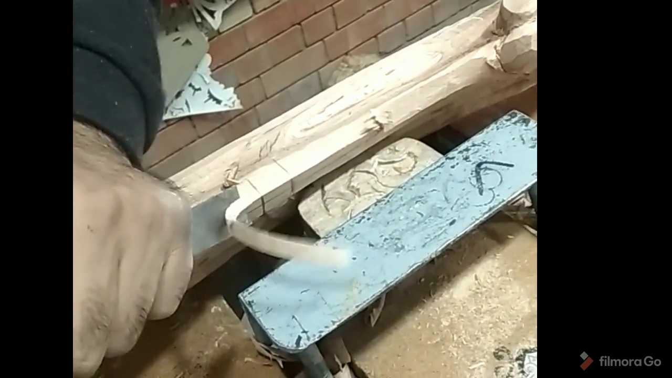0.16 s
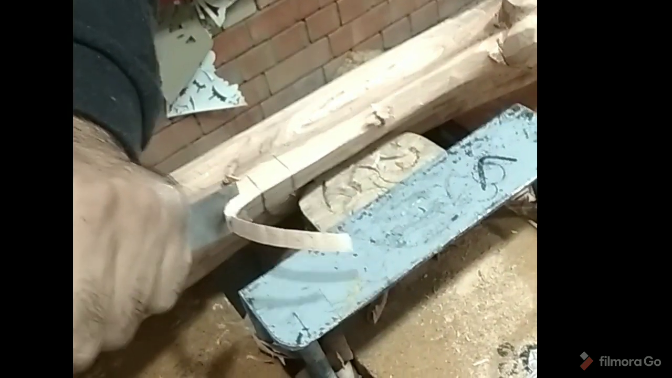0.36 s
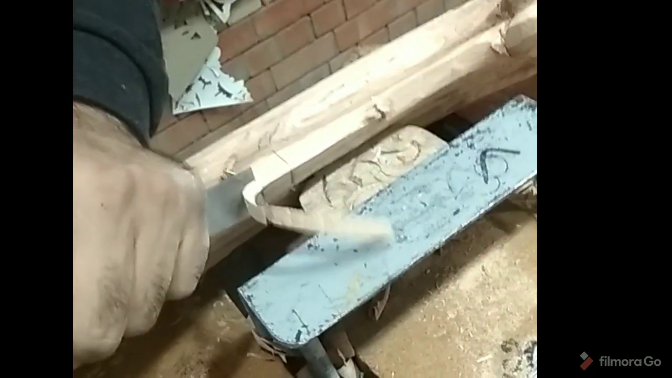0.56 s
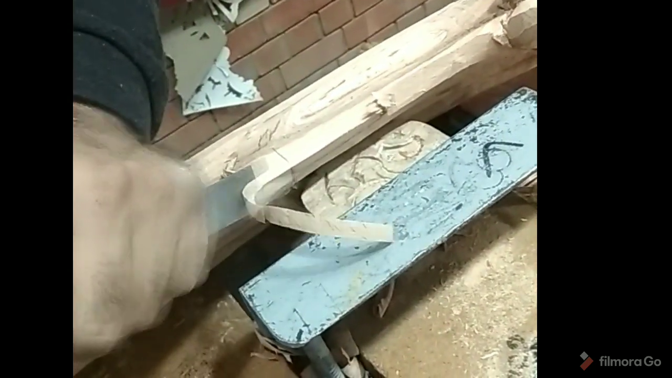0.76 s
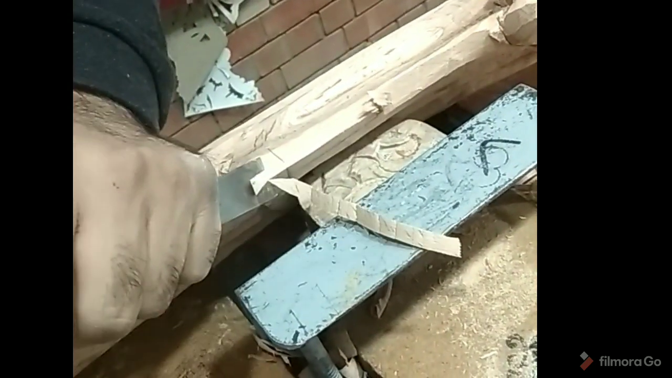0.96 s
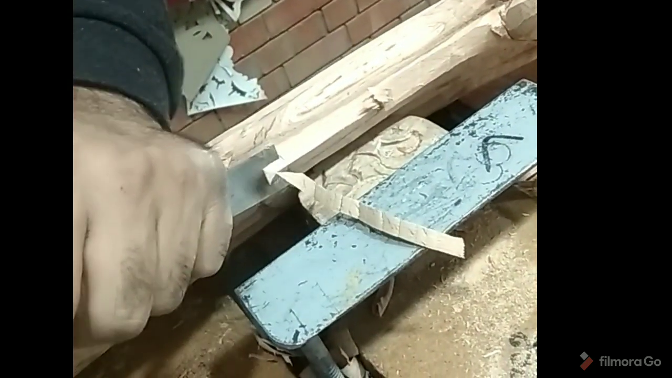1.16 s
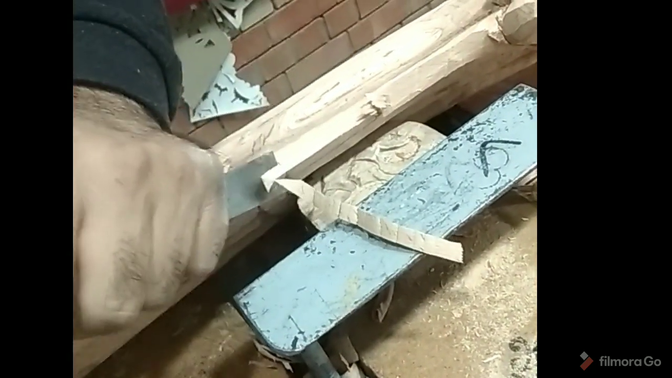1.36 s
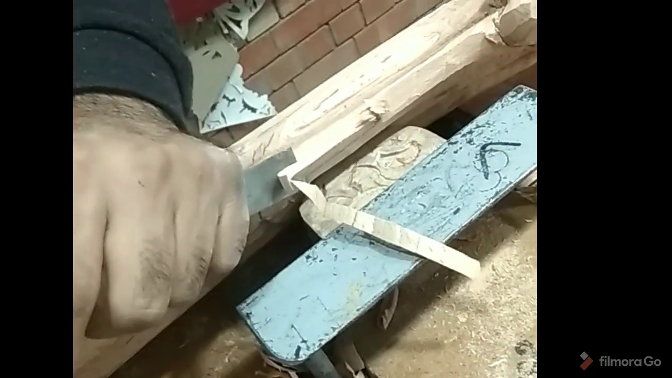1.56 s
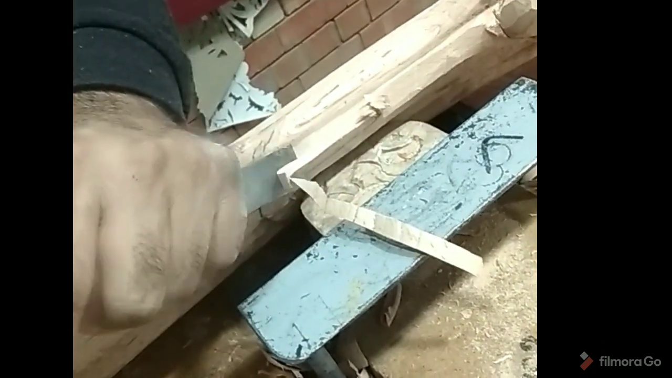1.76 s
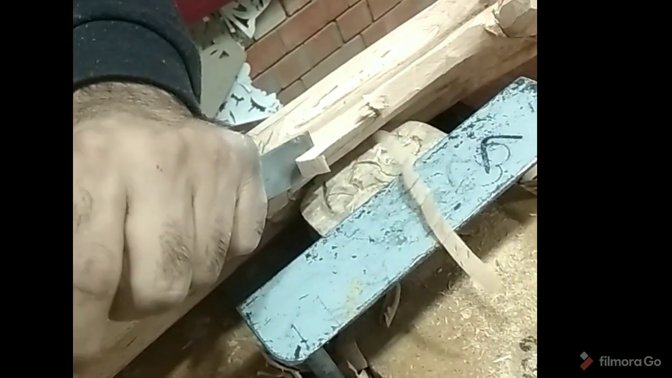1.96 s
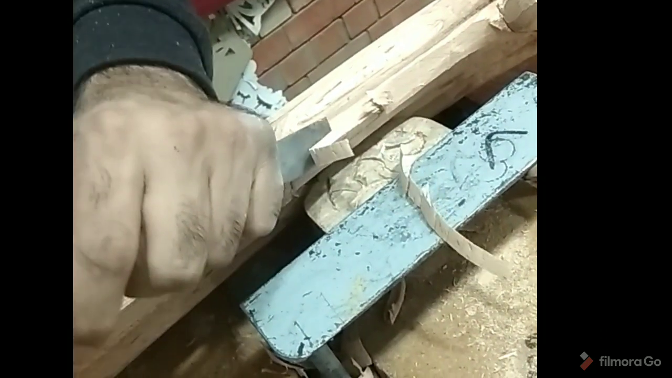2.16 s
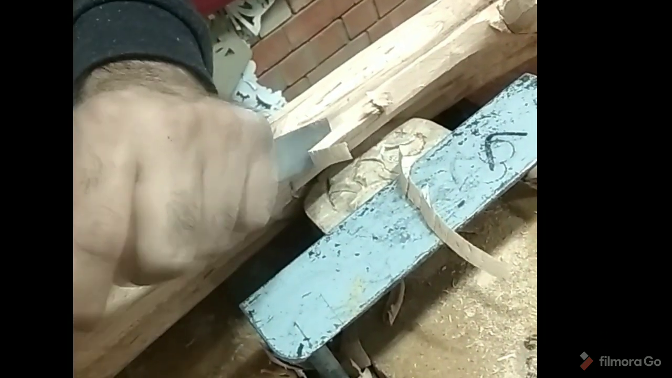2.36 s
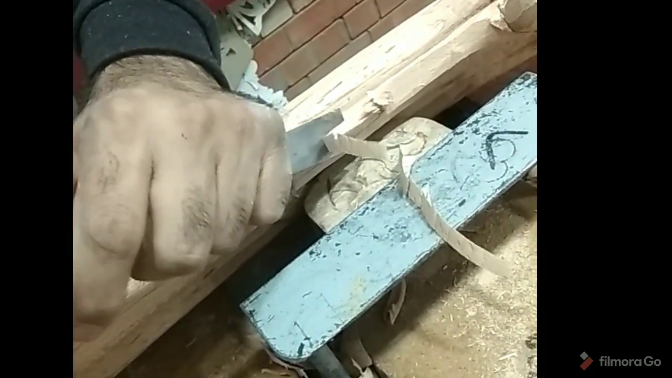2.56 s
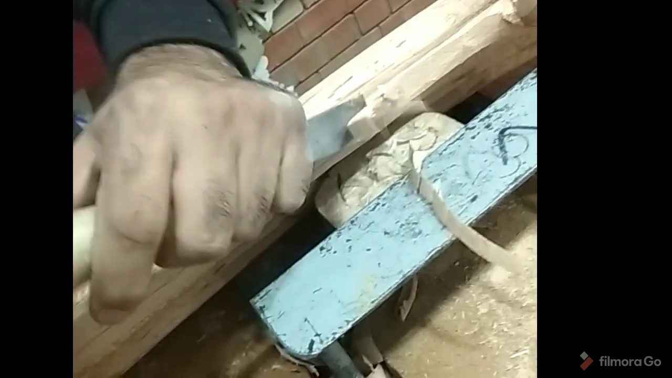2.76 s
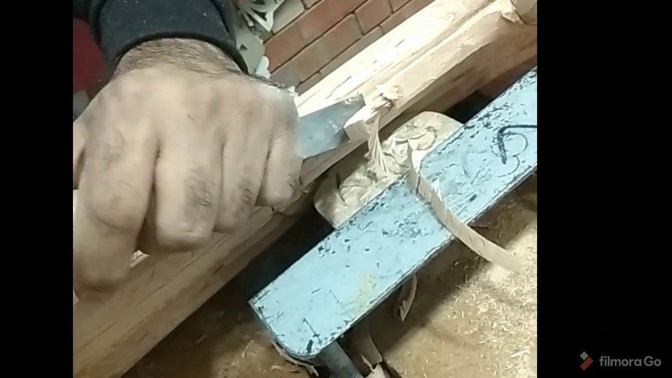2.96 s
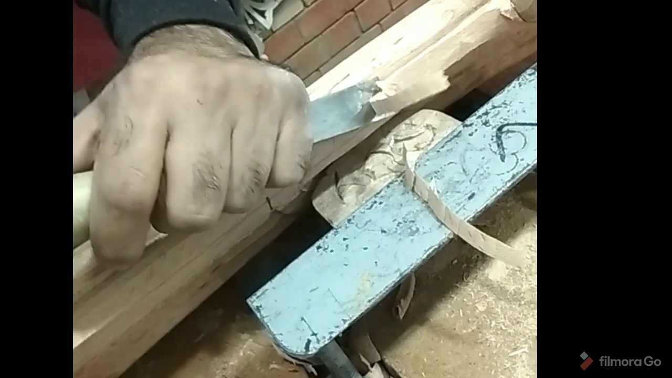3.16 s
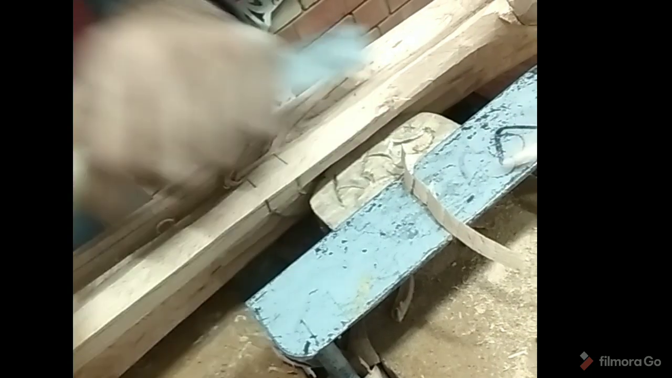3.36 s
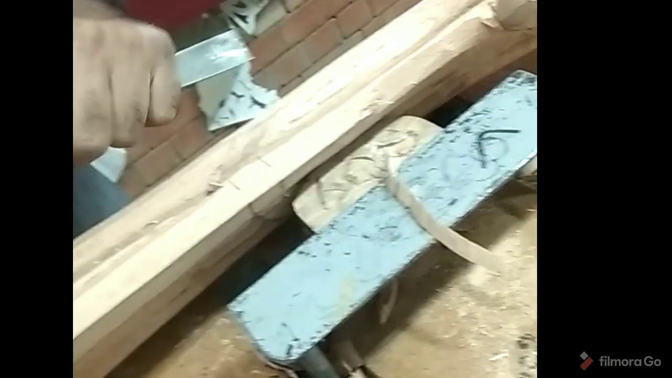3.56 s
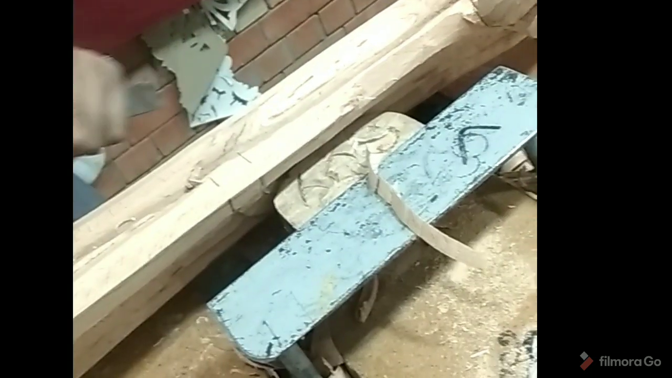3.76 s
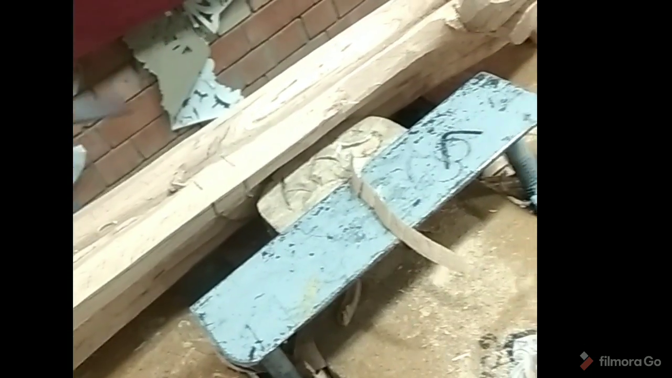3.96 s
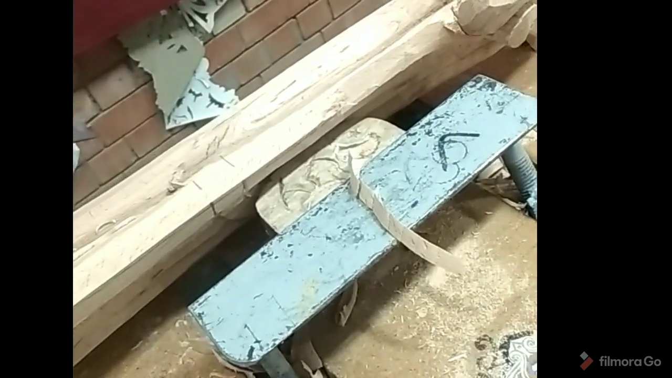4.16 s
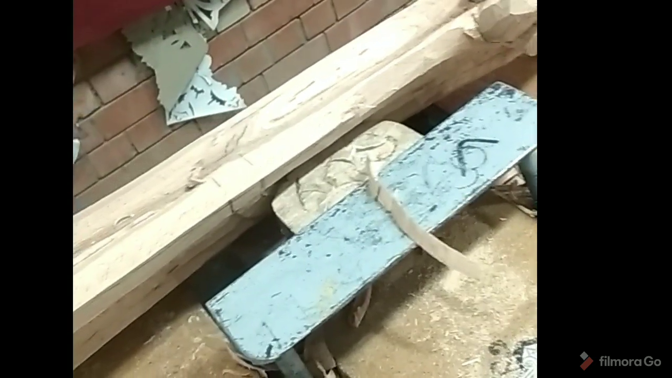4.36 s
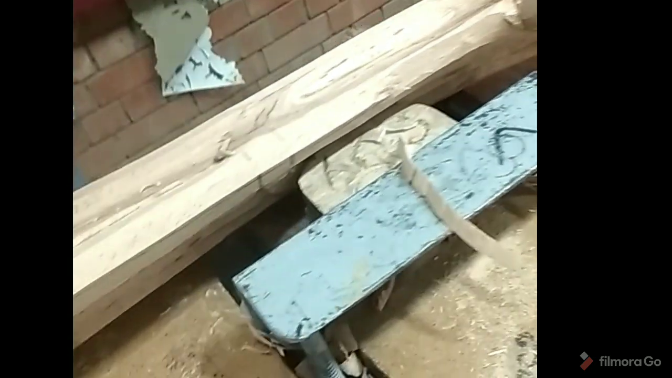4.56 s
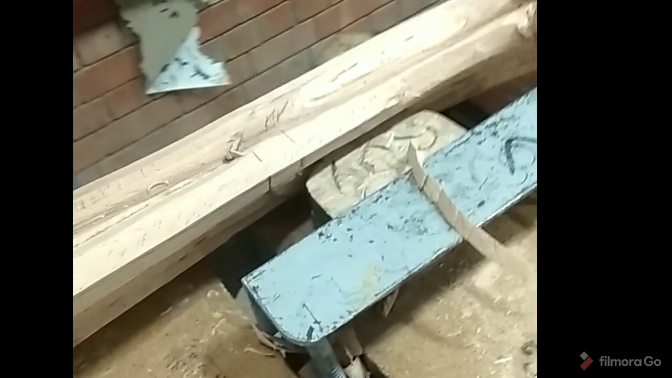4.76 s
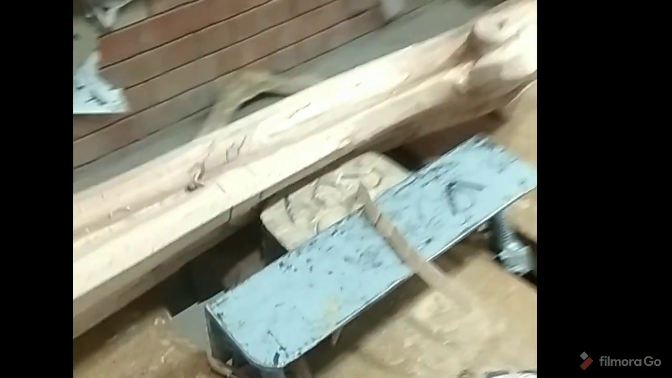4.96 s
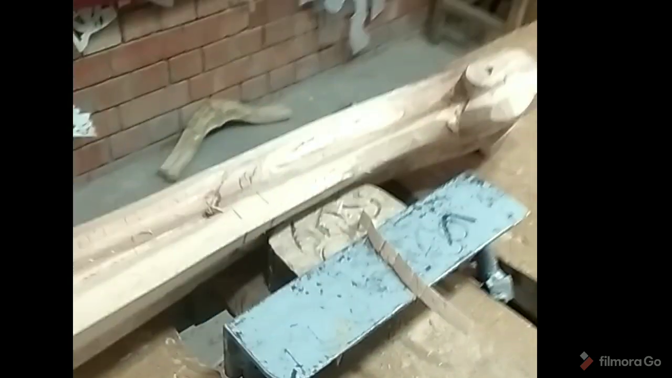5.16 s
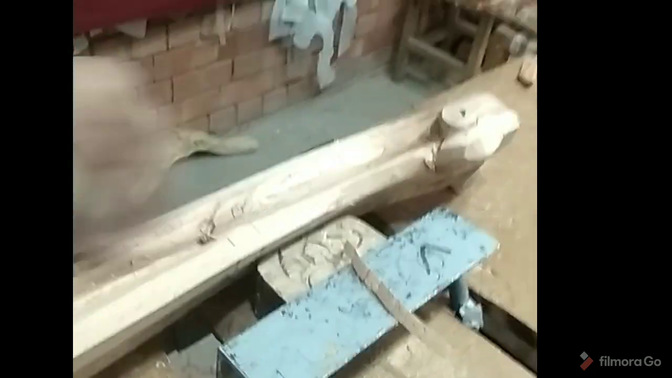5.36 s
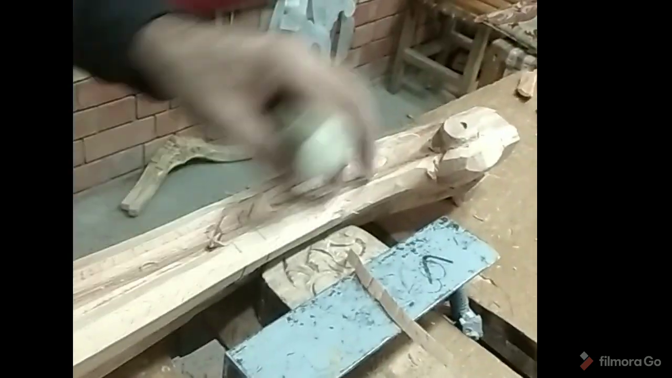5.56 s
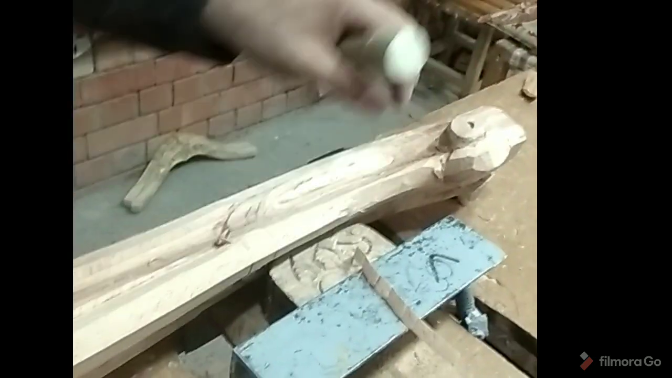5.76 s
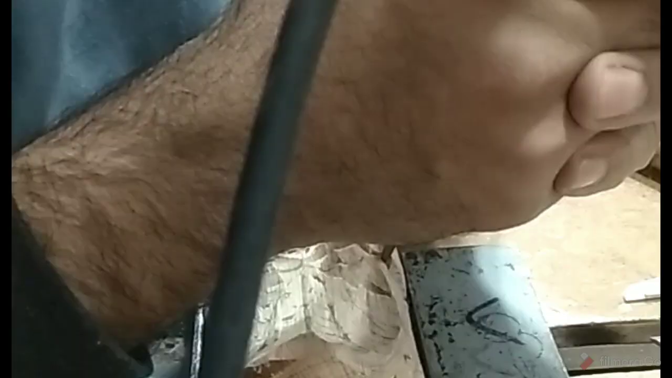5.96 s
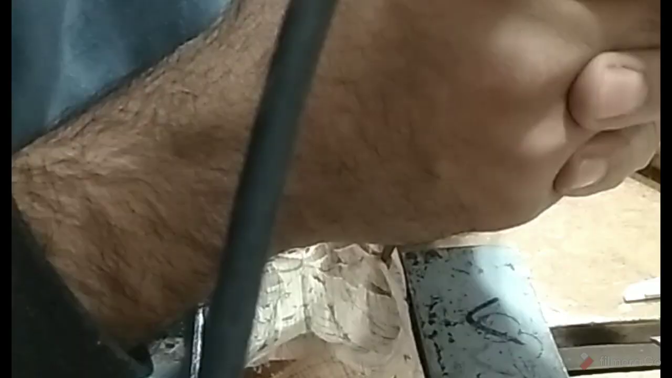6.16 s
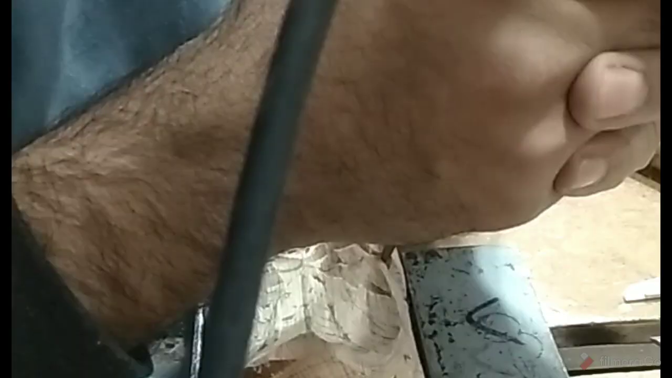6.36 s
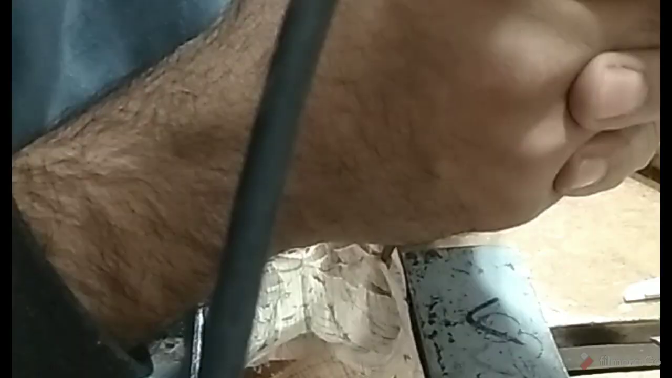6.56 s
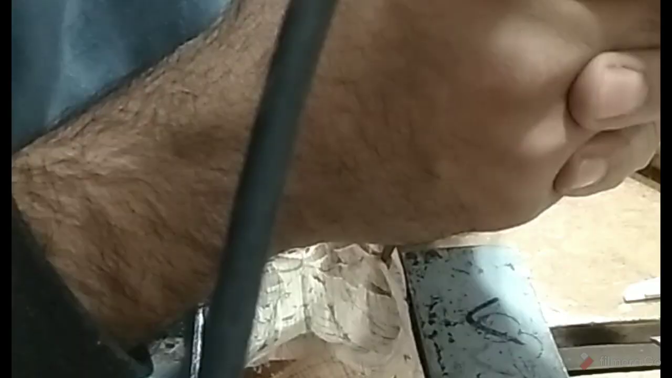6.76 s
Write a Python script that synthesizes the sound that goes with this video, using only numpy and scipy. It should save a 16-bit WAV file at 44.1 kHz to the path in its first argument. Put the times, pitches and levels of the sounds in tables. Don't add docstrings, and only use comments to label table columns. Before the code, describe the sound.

Loud, slightly overloaded knocks on a chisel with tearing fibres, then a clattering breakout, soft handling noises, and a sudden cut to a steady whirring grinder.

```python
import sys
import numpy as np
from scipy import signal
from scipy.fft import rfft, irfft, next_fast_len
from scipy.io import wavfile
from scipy.ndimage import uniform_filter1d, minimum_filter1d, map_coordinates

SR = 44100
rng = np.random.default_rng(int(sys.argv[2]) if len(sys.argv) > 2 else 0)


def dump_mix(stems):
    frames = np.atleast_2d(stems).T
    limited = np.clip(frames, -1, 1)
    pcm = np.round(limited * 32767).astype(np.int16)
    wavfile.write(sys.argv[1], SR, pcm)


def how_loud(loudness_db):
    steps = np.asarray(loudness_db, float) / 20
    return 10 ** steps


N = 300321
T_S = np.arange(N) / SR
EVENT_S = np.arange(SR // 2) / SR
CARVING_ENDS_S, GRINDER_STARTS_S = 5.871, 5.910
SETTLED_THUMP_HZ = 206
TOP_HZ = 15800

# t/s, wood peak/dB, thump/dB rel, crack/dB rel, contact/s
BLOWS = [
    (0.195, -2, -20, -37.5, 0.019),
    (0.527, -2, -23, -15.5, 0.046),
    (0.868, -4, -18, -9, 0.035),
    (1.204, -2, -14.5, -12.5, 0.015),
    (1.536, -2.5, -23, -8, 0.03),
    (1.877, -3.5, -24, -11.5, 0.013),
    (2.196, -5, -8.5, -8, 0.015),
    (2.511, -8, -11, -9, 0.026),
    (2.838, -7.5, -10, -9.5, 0.026),
    (3.141, -12, -37, -13, 0.018),
]
# f/Hz, width/Hz, level/dB
CRADLE = [(33.9, 26, -3.5), (106.6, 30, -5), (184, 250, -1.5), (350, 219, -1.5), (466, 460, -16),
          (750, 8.5, -18.5)]
# f/Hz, width/Hz, level/dB
BENCH = [(49.7, 100, -36), (105, 23, -7), (310, 31, -15), (540, 370, -24)]
# f/Hz, width/Hz, level/dB
EDGE = [(4500, 2400, -0.5), (6150, 1300, -3), (8800, 1300, -6.5), (12600, 9000, -10.5)]
# f/Hz, width/Hz, level/dB
FIBRE = [(5040, 14000, -7.5), (8230, 710, 2), (11000, 980, -4.5), (14400, 1800, -11.5)]


def unit(x):
    return x / np.sqrt(np.mean(x ** 2) + 1e-20)


def along(points, hz):
    f, v = np.transpose(points)
    return np.interp(np.log(hz + 1), np.log(f + 1), v)


def wobble(rate_hz):
    knots = rng.standard_normal(int(N * rate_hz / SR) + 4)
    return map_coordinates(knots, [np.arange(N) * rate_hz / SR])


def filtered(x, response):
    m = next_fast_len(len(x) + 8192)
    return irfft(rfft(x, m) * response(np.fft.rfftfreq(m, 1 / SR)), m)[:len(x)]


def noise(spectrum):
    return unit(filtered(rng.standard_normal(N), lambda hz: how_loud(along(spectrum, hz))))


def causal(gain):
    c = irfft(np.log(gain + 1e-9))
    half = len(c) // 2
    folded = np.concatenate([c[:1], 2 * c[1:half], np.zeros(len(c) - half)])
    return irfft(np.exp(rfft(folded)))


def add(out, start, x):
    out[start:][:len(x)] += x * np.clip(np.linspace(3, 0, len(x)), 0, 1)


def rung(push, modes, soft_hz=np.inf):
    gains = how_loud(np.array(modes)[:, 2] + .8 * rng.standard_normal(len(modes)))
    f = np.fft.rfftfreq(len(push), 1 / SR)
    each = np.array([(-1) ** k * gains[k] * 1j * f * w / (c * c - f * f + 1j * f * w)
                     for k, (c, w, _) in enumerate(modes)])
    each = each / (1 + 1.4j * f / soft_hz - (f / soft_hz) ** 2) ** 2
    spectrum = rfft(push) * each.sum(axis=0)
    around = np.linalg.norm(each, axis=0)
    y = irfft(spectrum, len(push))
    peak = np.abs(y).max()
    return y / peak, around * np.linalg.norm(spectrum) / np.linalg.norm(around) / peak


def room(x, near_db=0):
    # f/Hz, t60/s
    walls = [(60, 4.8), (250, 0.84), (1000, 0.88), (3000, 0.6), (5500, 0.55), (8000, 0.79), (15000, 0.71)]
    # f/Hz, level/dB
    far_walls = [(4500, 0), (8000, -9), (15000, -17)]
    # f/Hz, level/dB
    near_wall = [(4500, -20.5), (7500, -2.5), (13000, 8.5), (15500, -10.5)]
    # f/Hz, level/dB
    bench_top = [(3000, 10.5), (6000, 3.5), (9000, 7), (15000, 3)]
    near_t60_s, near_ends_s, near_edge_s, bench_t60_s = .3, .068, .01, .12
    hz, t, z = signal.stft(rng.standard_normal(len(x)), SR, nperseg=256)
    late = how_loud(along(far_walls, hz)[:, None] - 60 * t / along(walls, hz)[:, None])
    near = how_loud(near_db + along(near_wall, hz)[:, None] - 60 * t / near_t60_s)
    near = near / (1 + np.exp((t - near_ends_s) / near_edge_s))
    quick = how_loud(along(bench_top, hz)[:, None] - 60 * t / bench_t60_s)
    tail = signal.istft(z * (late + near + quick), SR, nperseg=256)[1]
    return signal.fftconvolve(x, tail / np.linalg.norm(tail))[:len(x)]


def contacts(rows, *, wood, base, edge, rise_s, low_db, low_lasts, high_db, high_lasts, wet_db,
             thump_width_hz, boom_db=0, near_db=0, solid=0, soft_hz=np.inf, lumpy_db=0):
    t, lead = EVENT_S, SR // 10
    out = np.zeros(N + SR + lead)
    lasts = np.array([[1], [low_lasts], [high_lasts]])
    for s, db, thump_db, crack_db, length_s, thump_hz in rows:
        rough = rng.standard_normal((3, len(t))) * (1 - np.exp(-t / rise_s))
        push = rough * how_loud(-60 * t / (length_s * lasts))
        push[0, 4] += solid * np.linalg.norm(push[0])
        push = push * how_loud(lumpy_db * map_coordinates(rng.standard_normal(SR // 8), [t * 170]))
        bodies = [wood, base + [(thump_hz, thump_width_hz, boom_db)], edge]
        parts = zip(push, bodies, (soft_hz, soft_hz, np.inf))
        near, heard = zip(*[rung(*part) for part in parts])
        mix = how_loud(np.array([0, thump_db + low_db, crack_db + high_db]))[:, None]
        tap = causal(np.linalg.norm(mix * heard, axis=0))
        sound = (mix * near).sum(axis=0) + how_loud(wet_db) * room(tap, near_db)
        add(out, round(s * SR) + lead, how_loud(db) * sound)
    return out[lead:lead + N]


def tones(rows, sag, fade_db, wet_db, rough):
    out, t = np.zeros(N + SR), EVENT_S
    for s, db, hz, length_s in rows:
        damped = 1 + np.exp(np.clip((t / length_s - 1) / .15, -50, 50))
        shape = (1 - np.exp(-t * hz)) * how_loud(-fade_db * t / length_s) / damped
        knots = rng.standard_normal((2, SR // 8))
        shake = rough * map_coordinates(knots, [[[0], [1]] + 0 * t, [t * hz / 12] * 2])
        pitch_hz = hz * (1 + sag * (.5 - np.minimum(t / length_s, 1)))
        note = shape * (1 + shake[0]) * np.sin(2 * np.pi * np.cumsum(pitch_hz) / SR + shake[1])
        add(out, round(s * SR), how_loud(db) * (note + how_loud(wet_db) * room(note)))
    return out[:N]


def moves(rows, rise):
    out = 0
    for s, length_s, *db in rows:
        swell = np.interp(T_S, [s, s + rise * length_s, s + length_s], [0, 1, 0])
        out = out + how_loud(np.array(db))[:, None] * np.sqrt(swell)
    return out


def room_tone():
    # f/Hz, level/dB
    air = [(20, 0), (40, 1.5), (90, -0.5), (200, -4.5), (330, -9), (500, -15), (1500, -20), (2400, -26.5),
           (5000, -32), (13000, -38.5), (16000, -49)]
    return how_loud(-57.5 + 0.78 * wobble(35)) * noise(air)


def far_machine():
    # f/Hz, level/dB
    hum = [(296, -63.5)]
    return sum(how_loud(db + 3.5 + 1.3 * wobble(2.8)) * np.sin(2 * np.pi * hz * T_S + 0.54 * wobble(9.3))
               for hz, db in hum)


def stirring():
    # t/s, length/s, sleeve/dB, sawdust/dB
    rustles = [(3.105, 0.042, -73, -68), (3.205, 0.041, -53, -51), (3.4, 0.028, -58, -73),
               (3.45, 0.11, -84, -72), (3.57, 0.11, -69, -78), (3.72, 0.15, -70, -72),
               (3.92, 0.15, -67, -65), (4.09, 0.079, -68, -64), (4.23, 0.12, -62, -71),
               (4.33, 0.08, -73, -79), (4.85, 0.12, -70.5, -67.5), (4.96, 0.1, -85, -72),
               (5.18, 0.12, -64, -70), (5.272, 0.059, -64, -76.5), (5.33, 0.32, -62.5, -71),
               (5.61, 0.1, -63.5, -67.5), (5.8, 0.088, -76, -81.5)]
    # t/s, length/s, level/dB
    shuffles = [(3.46, 0.079, -51.5), (3.58, 0.094, -68), (3.72, 0.13, -45.5), (3.9, 0.08, -47.5),
                (4.11, 0.1, -50.5), (4.22, 0.15, -49.5), (4.39, 0.18, -53), (5.07, 0.19, -54.5),
                (5.26, 0.095, -50), (5.36, 0.31, -55), (5.71, 0.16, -56.5)]
    # t/s, length/s, level/dB
    slide = (4.315, .055, -56)
    # f/Hz, density/dB per Hz
    cloth = [(1500, -5), (3000, -6.5), (5000, -7), (7000, -6), (10000, -20)]
    sawdust = [(5000, -40), (7500, -12), (10000, -1), (14000, -9), (16000, -4.5)]
    floor = [(30, 13.5), (60, -23), (110, 19), (200, 9.5), (400, 0.5), (800, -34)]
    # f/Hz, width/Hz, level/dB
    scrape = [(6730, 900, -18.5), (9800, 260, 0), (11100, 950, -19)]
    sleeve_gain, dust_gain = moves(rustles, rise=0.43)
    grain = how_loud(2.3 * wobble(88))
    out = sleeve_gain * unit(grain * noise(cloth)) + dust_gain * unit(grain * noise(sawdust))
    out = out + moves(shuffles, rise=0.12)[0] * unit(how_loud(1.7 * wobble(5.014)) * noise(floor))
    slide_gain = moves([slide], rise=0.65)[0] ** 2 / how_loud(slide[2])
    return out + slide_gain * unit(grain * rung(rng.standard_normal(N), scrape)[0])


def touches():
    # t/s, wood peak/dB, thump/dB rel, tick/dB rel
    rows = [
        (3.586, -45.5, 17, -30),
        (3.668, -52, -30, -34),
        (3.713, -52.5, 19.5, -37.5),
        (3.734, -49, 13.5, -7),
        (3.893, -63.5, 20, -19),
        (4.794, -58.5, -12, -24),
    ]
    # f/Hz, width/Hz, level/dB
    loose_tool = [(1030, 150, -6), (1700, 300, -9), (2100, 300, -6), (2350, 300, -12), (4300, 500, -20)]
    contact_s = 0.065
    return contacts([(*row, contact_s, SETTLED_THUMP_HZ) for row in rows], wood=loose_tool, base=BENCH,
                    edge=FIBRE, rise_s=0.01, low_db=-7.5, low_lasts=0.25, high_db=-3.0, high_lasts=0.77,
                    wet_db=3.5, thump_width_hz=9.3, boom_db=0.5)


def grasp():
    # t/s, wood peak/dB, thump/dB rel, tick/dB rel, thump f/Hz
    rows = [(5.087, -73.5, 3.5, -22, 179.5), (5.268, -48, -9, -20.5, 283), (5.278, -43.5, 2, -21, 326),
            (5.298, -48, -18, -34, 293), (5.32, -54, 3, -30, 310), (5.36, -55.5, -9, -24, 298),
            (5.404, -58, -15, -25, 299), (5.45, -62.5, -11, -26, 300), (5.488, -67.5, -4.5, -11, 105),
            (5.618, -53.5, 1, -24, 303), (5.851, -57.5, -1, -26, 285)]
    # f/Hz, width/Hz, level/dB
    held_tool = [(880, 85, 0), (1232, 53, 2), (1700, 91, -1), (2025, 180, -4.5), (2680, 660, -21),
                 (4300, 170, -11)]
    contact_s = 0.1
    return contacts([(*row, contact_s, hz) for *row, hz in rows], wood=held_tool, base=BENCH, edge=FIBRE,
                    rise_s=0.0061, low_db=-2.0, low_lasts=1.4, high_db=6.0, high_lasts=1.65, wet_db=4.0,
                    thump_width_hz=38.0, boom_db=7)


def chips():
    # t/s, peak/dB, f/Hz
    rows = [(0.953, -31, 4240), (0.974, -39, 4620), (1.242, -43, 9500), (1.3725, -31, 4500),
            (1.49, -56, 10000), (1.543, -32, 11000), (1.607, -20, 4500), (2.638, -58, 9900),
            (2.845, -29, 11000), (2.905, -36, 4200), (3.35, -46.5, 10500), (3.6327, -55, 5300),
            (3.655, -63, 4410), (3.7694, -63, 4110), (3.817, -52.5, 4470), (3.8556, -54.5, 4500),
            (3.9562, -48.5, 6160), (4.0918, -56, 5310), (4.1605, -49.5, 4300), (4.3697, -45.5, 5750),
            (4.9397, -54.5, 4180), (5.009, -58, 4510), (5.182, -53.5, 4070), (4.798, -58.5, 1696),
            (5.619, -49.5, 2500), (5.8096, -55.5, 4230)]
    out, t = np.zeros(N + SR), EVENT_S
    for s, db, hz in rows:
        push = rng.standard_normal(len(t)) * how_loud(-60 * t / .005)
        tick, heard = rung(push, [(hz, .5 * hz, 0)])
        add(out, round(s * SR), how_loud(db + 3.5) * (tick + how_loud(-8.5) * room(causal(heard))))
    return out[:N]


def blade_pings():
    # t/s, peak/dB, f/Hz, length/s
    rows = [
        (3.213, -37, 2060, 0.035),
        (3.44, -36, 870, 0.033),
        (3.59, -40.5, 2090, 0.014),
        (3.67, -58, 2350, 0.04),
        (3.716, -39, 2000, 0.005),
        (3.73, -44, 1965, 0.017),
        (4.8, -58, 2040, 0.024),
        (5.62, -51, 1346, 0.019),
    ]
    return tones(rows, sag=0.031, fade_db=9.0, wet_db=-11, rough=.6)


def log_rocks():
    # t/s, peak/dB, f/Hz, length/s
    rows = [(.259, -13, 311, 0.021), (1.613, -26, 292.6, 0.063), (1.69, -33, 215, .08),
            (2.18, -26.5, 300, .014), (1.915, -13, 300, 0.016), (1.889, -8, 242, 0.018),
            (1.889, -11.5, 360, 0.029), (1.94, -21.5, 231, 0.046), (2.0, -28.5, 219.7, 0.052),
            (2.205, -24, 248, 0.026), (2.524, -12, 350, 0.0096), (1.9, -25.5, 192.3, 0.066),
            (2.19, -25.5, 345.3, 0.078), (2.91, -23.5, 206.5, 0.057), (3.16, -28, 203, 0.12),
            (3.6, -33, 209, 0.083), (3.73, -40, 202, .05), (5.09, -47, 172, .07), (5.47, -50, 101.4, 0.15)]
    return tones(rows, sag=.02, fade_db=8.5, wet_db=-10, rough=.45)


def patchy(x, depth_db):
    z = signal.stft(x, nperseg=512)[2]
    field = uniform_filter1d(rng.standard_normal(z.shape), size=4, axis=0)
    field = uniform_filter1d(field, size=18, axis=1)
    return signal.istft(z * how_loud(depth_db * unit(field)), nperseg=512)[1][:N]


def shaded(x):
    # middle t/s, half length/s, f/Hz, width/Hz, level/dB
    shades = [(6.36, .12, 4150, 100, -20), (6.39, .03, 4220, 130, -14), (6.46, .04, 4400, 120, -18),
              (6.65, .11, 4200, 130, -22), (6.59, .07, 3720, 130, -20), (6.42, .05, 3620, 110, -18),
              (6.72, .03, 3670, 90, -20), (6.33, .15, 3840, 50, -14), (6.03, .07, 3830, 60, -14),
              (6.2, .08, 3580, 70, -12), (6.6, .04, 4400, 80, -16), (6.76, .04, 4580, 60, -12),
              (6.32, .03, 2790, 90, -20), (6.41, .03, 2880, 70, -14), (6.42, .12, 6640, 130, -14),
              (6.52, .02, 6720, 120, -18), (6.4, .07, 13250, 250, -22), (6.23, .03, 14100, 200, -16),
              (6.33, .03, 14900, 200, -14), (6.55, .05, 14400, 250, -16), (6.63, .03, 14100, 250, -18),
              (6.71, .03, 14200, 250, -18)]
    hz, t, z = signal.stft(x, SR, nperseg=1024)
    dip_db = sum(db * np.exp(-((hz[:, None] - c) / w) ** 2 - ((t - s) / half_s) ** 4)
                 for s, half_s, c, w, db in shades)
    return signal.istft(z * how_loud(dip_db), SR, nperseg=1024)[1][:N]


def grinder():
    # t/s, level/dB
    fade = [
        (5.912, -35.5),
        (5.934, -27),
        (6.106, -17.5),
        (6.796, -17.5),
        (6.81, -20.5),
    ]
    # shaft order, level/dB rel
    whine_orders = [(4, -27), (12, -29), (16, -19), (20, -28), (24, -13), (32, -30), (48, -19), (60, -41)]
    # f/Hz, density/dB per Hz
    roar_spectrum = [(15, -50), (25, -22.5), (223, -25.5), (301, -19), (531, -18), (962, -4.5), (1190, -12),
                     (1400, -11.5), (1940, -12), (3250, 4.5), (4140, -2.5), (5880, -4.5), (6560, -6.5),
                     (11900, -6), (16000, -20)]
    # f/Hz, width/Hz, level/dB
    housing = [(486, 46, 5.5), (940, 69, -1.5), (1286, 100, -5.5), (1377, 89, 15), (2980, 200, 1),
               (3430, 480, -9.5), (4070, 470, -9), (6600, 130, 0), (8700, 220, -5.5), (11060, 860, 4.5),
               (13300, 350, -1.5), (2830, 260, -7.5), (3910, 31, -16), (15240, 340, -0.5)]
    shaft_hz = 247.63
    turn = 2 * np.pi * np.cumsum(shaft_hz * (1 + 0.0001 * wobble(4.5))) / SR
    beat = (1 + 0.15 * np.cos(turn)) * how_loud(0.705 * wobble(250) + 0.88 * wobble(40))
    raw = beat * patchy(noise(roar_spectrum), depth_db=-0.5)

    def coloured(depth):
        def gain(hz):
            return how_loud(depth * sum(db * np.exp(-((hz - c) / w) ** 2) for c, w, db in housing))
        return unit(filtered(raw, gain))

    closed = np.interp(T_S, (6, 6.88), [0, 1])
    roar = shaded((1 - closed) * coloured(0.68) + closed * coloured(0.86))
    whine = sum(how_loud(db + 3.0 + 0.59 * wobble(28)) * np.sin(k * turn + rng.uniform(0, 2 * np.pi))
                for k, db in whine_orders)
    fade_s, fade_db = np.transpose(fade)
    return how_loud(np.interp(T_S, fade_s, fade_db)) * (roar + whine)


def tears():
    # t/s, length/s, level/dB, loss until the end/dB
    rows = [(.002, 0.042, -32, 20.5), (0.19, 0.057, -36, 16), (0.257, 0.074, -31.5, 18.5),
            (.533, 0.1, -45.5, 20), (0.872, .055, -42, 10), (1.213, 0.042, -36.5, 6.5),
            (1.536, 0.034, -47, 13), (1.61, 0.064, -31, 8), (1.89, 0.067, -17, 24),
            (2.176, .016, -40.5, -1.5), (2.203, 0.051, -31.5, 11), (2.528, 0.044, -33.5, 16),
            (2.844, 0.037, -36, 10), (2.911, 0.035, -39, 4), (3.154, 0.036, -33.5, 7.5),
            (3.428, 0.064, -49.5, 17)]
    rise_s, edge_s, grain_db, tail_db, tail_t60_s = 0.0037, 0.0036, 2.5, -11, .3
    spread = .07
    out, t = np.zeros(N + SR), EVENT_S
    for s, length_s, db, loss_db in rows:
        grain = how_loud(grain_db * map_coordinates(rng.standard_normal(SR // 8), [t * 330]))
        fibre = [(hz * (1 + spread * rng.standard_normal()), w, level) for hz, w, level in FIBRE]
        going = 1 / (1 + np.exp(np.clip((t - length_s) / edge_s, -50, 50)))
        tail = how_loud(tail_db - loss_db - 60 * (t - length_s) / tail_t60_s) * (1 - going)
        body = going * grain * how_loud(-loss_db * t / length_s)
        shape = (1 - np.exp(-t / rise_s)) * (body + tail)
        crackle = unit(rung(rng.standard_normal(len(t)), fibre)[0])
        add(out, round(s * SR), how_loud(db) * shape * crackle)
    return out[:N]


def jolts():
    # t/s, wood peak/dB, thump/dB rel, contact/s, thump f/Hz
    rows = [
        (-.02, -14, -2, 0.071, 420),
        (0.254, -17, -2, 0.39, 322),
        (1.606, -10.5, -9.5, 0.47, 266.7),
        (1.89, -10, -2, 0.021, 270.7),
        (2.178, -19, -4, 0.2, 252),
        (2.528, -29, 5, 0.033, 382),
        (2.904, -17, -5, 0.39, 213),
        (3.153, -21.5, -1.5, 0.12, 206),
    ]
    # f/Hz, width/Hz, level/dB
    log_modes = [(597, 200, -18.5), (1143, 630, 5), (1526, 580, 6), (1578, 130, 5), (2230, 270, -0.5),
                 (3000, 1000, -25.5), (4260, 860, -14)]
    torn_db = -45
    rows = [(s, db, thump_db, torn_db, length_s, hz) for s, db, thump_db, length_s, hz in rows]
    return how_loud(-3.0) * contacts(rows, wood=log_modes, base=CRADLE, edge=FIBRE, soft_hz=6000, lumpy_db=4.0,
                                rise_s=0.0031, low_db=3.5, low_lasts=1.0, high_db=7.0, high_lasts=2.3,
                                wet_db=1.0, thump_width_hz=90, boom_db=0.5)


def shank():
    # pitch ratio, level/dB, share of glide and ring time
    bending = [(0.999, 0.5, 0.93), (2.45, -1.5, 0.24), (5.001, -9.5, 0.086)]
    shank_hz, drop, slack_s, t60_s = 810, .5, .013, .4
    rebound, rebound_s, ends_s = .4, .01, .042
    level_db, fade_db_per_s = -15, 3.5
    out, t = np.zeros(N + SR), EVENT_S
    glide = drop * np.exp(-t / slack_s) + rebound * np.exp(np.minimum(t - ends_s, 0) / rebound_s)
    for s, db, *_ in BLOWS:
        ring = 0
        for ratio, mode_db, share in bending:
            hz = ratio * shank_hz * (1 + share * glide) * (1 + 0.0091 * rng.standard_normal())
            decay = how_loud(mode_db + rng.normal(0, 1) - 60 * t / (share * t60_s))
            ring = ring + np.sin(2 * np.pi * np.cumsum(hz) / SR) * decay
        ring = ring * (1 - np.exp(-t / .003)) / (1 + np.exp((t - ends_s) / .004))
        add(out, round(s * SR), how_loud(db + level_db - fade_db_per_s * s) * (ring + how_loud(-6) * room(ring)))
    return out[:N]


def breakout():
    # t/s, wood peak/dB, thump/dB rel, crack/dB rel, contact/s
    rows = [
        (3.423, -8.5, -22, -14, 0.015),
    ]
    # f/Hz, width/Hz, level/dB
    freed = [(1020, 140, 1.5), (1580, 250, 1.5), (2190, 470, 7), (2800, 1120, -3), (3997, 200, 2)]
    return contacts([(*row, SETTLED_THUMP_HZ) for row in rows], wood=freed, near_db=-8.5, solid=0.94,
                    base=BENCH, edge=EDGE, rise_s=0.00051, low_db=0, low_lasts=11.5, high_db=0.5,
                    high_lasts=0.95, wet_db=-13.5, thump_width_hz=140.0)


def mallet_blows():
    # f/Hz, width/Hz, level/dB
    shallow = [(750, 210, -8.5), (990, 300, -2), (1480, 580, -3.5), (1665, 140, -1.5), (1960, 110, 0),
               (2404, 110, -1.5), (3260, 350, -20.5), (4300, 620, -9.5), (5500, 320, -25)]
    deep = [(750, 180, -17.5), (865, 190, -5.5), (1018, 75, 5.5), (1600, 667, 3), (1615, 61, 6),
            (2020, 120, 0.5), (2700, 270, -9.5), (2980, 680, -26), (4240, 300, -9), (4640, 120, -21.5)]
    thump_hz = 334
    out = 0
    for rows, handle in ((BLOWS[:4], shallow), (BLOWS[4:], deep)):
        out = out + contacts([(*row, thump_hz) for row in rows], wood=handle, soft_hz=9100, lumpy_db=2.0,
                             near_db=-20.5, solid=0.67, base=CRADLE, edge=EDGE, rise_s=0.000092,
                             low_db=-4.5, low_lasts=8.5, high_db=1.0, high_lasts=0.89, wet_db=-10.5,
                             thump_width_hz=60)
    return out * how_loud(3.5)


def scene():
    # f/Hz, width/Hz, depth 0-1
    bench_dip = (6800, 1100, .45)
    carving = room_tone() + far_machine() + stirring() + touches() + grasp() + chips()
    carving = carving + blade_pings() + log_rocks() + tears() + jolts() + shank() + breakout() + mallet_blows()
    c, w, depth = bench_dip
    carving = filtered(carving, lambda f: 1 - depth * 1j * f * w / (c * c - f * f + 1j * f * w))
    sound = carving * (T_S < CARVING_ENDS_S) + grinder() * (T_S > GRINDER_STARTS_S)
    return np.array([sound, sound])


def gated(x, masked_db):
    # f/Hz, level/dB
    mute = [(2600, -6), (4000, -4.5), (6500, -2), (9000, -3), (12500, -2.5), (15500, -1)]
    # f/Hz, level/dB
    mask = [(2600, -36), (9000, -44.5), (12500, -26.5), (14000, -23), (15500, -16), (16500, -7.5)]
    # f/Hz, level/dB
    dither = [(2600, 1.5), (5000, 3.5), (12000, 4), (15000, 5)]
    gate_hz, ceiling_hz = 2600, 15000
    hz, _, z = signal.stft(x, SR, nperseg=1024)
    power = np.abs(z) ** 2 + 1e-20
    narrow = uniform_filter1d(uniform_filter1d(power, size=5, axis=0), size=2, axis=1)
    wide = np.exp(uniform_filter1d(np.log(power), size=41, axis=0))
    wide = wide[np.minimum(np.arange(len(hz)), np.searchsorted(hz, TOP_HZ - 900))]
    wander = uniform_filter1d(rng.standard_normal(z.shape), size=6, axis=0)
    wander = unit(uniform_filter1d(wander, size=9, axis=1))
    narrow = narrow * how_loud(2 * along(dither, hz)[:, None] * wander)
    whole, bright = power.mean(axis=0), power[hz > gate_hz].mean(axis=0)
    rise = bright / minimum_filter1d(bright, size=2)
    steady = rise < np.where(hz > ceiling_hz, 300, 3)[:, None]
    under_neighbours = narrow < wide * how_loud(2 * along(mute, hz))[:, None]
    under_whole = narrow < whole * how_loud(2 * (along(mask, hz)[:, None] + masked_db))
    shut = (under_neighbours | under_whole) & steady & (hz[:, None] > gate_hz)
    return signal.istft(z * np.where(shut, .02, 1), SR, nperseg=1024)[1][:N]


def band_limit(x):
    return signal.sosfilt(signal.butter(12, 16780, fs=SR, output="sos"), x)


def record(dry):
    # t/s, size
    sag = [
        (.195, 0.091),
        (0.529, 0.1),
        (0.869, 0.098),
        (1.205, 0.11),
        (1.54, -0.063),
        (1.885, -0.13),
        (1.91, 0.11),
        (2.19, -0.08),
        (2.52, -0.016),
        (2.84, -0.047),
    ]
    # f/Hz, density/dB per Hz
    preamp = [(10, 0), (30, -4), (100, -14), (300, -22), (1000, -31), (3000, -33), (10000, -41),
              (16000, -46)]
    # f/Hz, level/dB
    leak = [(300, -62), (900, -55), (1400, -44), (2200, -47), (3500, -36), (6000, -44), (10000, -53),
            (15000, -54)]
    clip_level = .9
    loud = filtered(2 * dry[0], lambda hz: np.clip((TOP_HZ - hz) / 200, 0, 1))
    left = loud / (1 + np.abs(loud / clip_level) ** 6) ** (1 / 6)
    left = gated(filtered(left, lambda hz: hz < 16780), masked_db=-1.0)
    for s, offset in sag:
        since_s = np.clip(T_S - s, 0, None)
        left = left + offset * (1 - np.exp(-since_s / .006)) * np.exp(-since_s / .06)
    live = (T_S < CARVING_ENDS_S) | (T_S > GRINDER_STARTS_S)
    hiss = how_loud(-65) * gated(noise(preamp), masked_db=-30) * live
    right = hiss - filtered(left, lambda hz: how_loud(along(leak, hz)))
    return band_limit(np.array([left, right]))


dry = scene()
out = record(dry)
dump_mix(out)
```